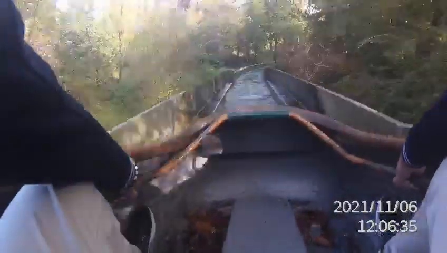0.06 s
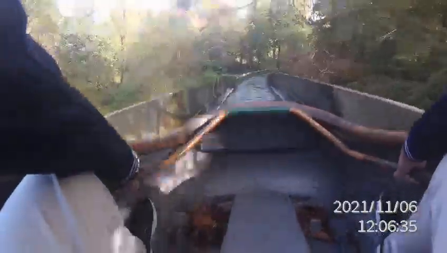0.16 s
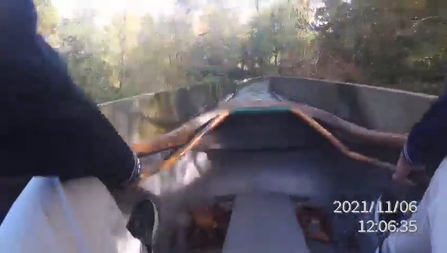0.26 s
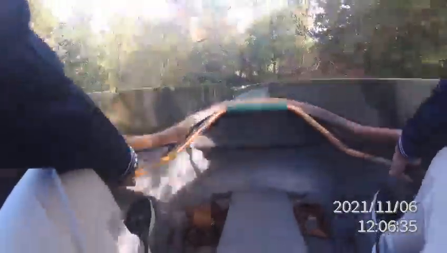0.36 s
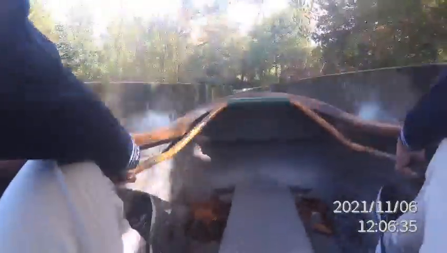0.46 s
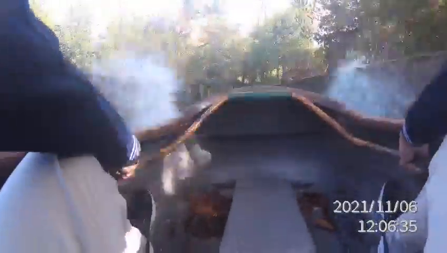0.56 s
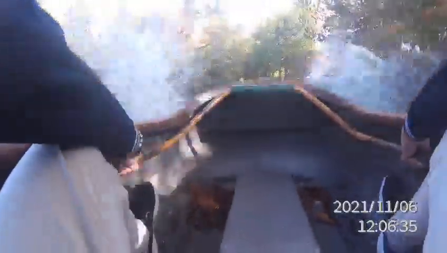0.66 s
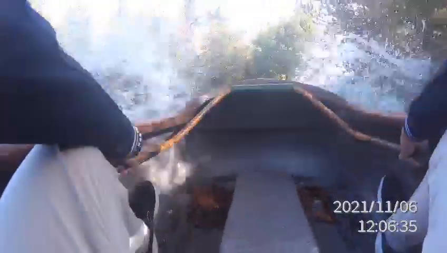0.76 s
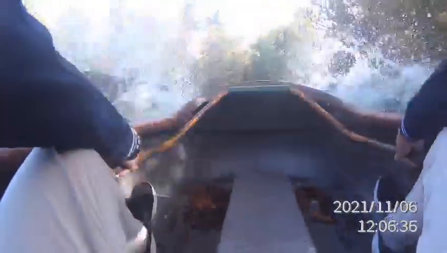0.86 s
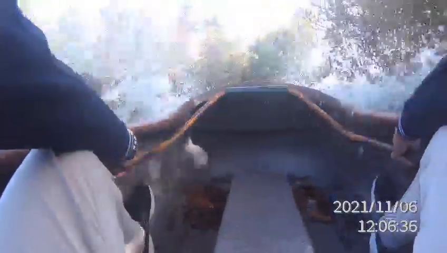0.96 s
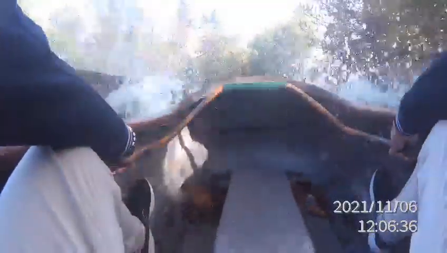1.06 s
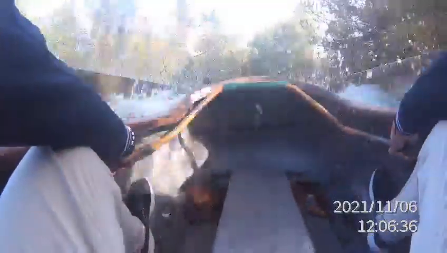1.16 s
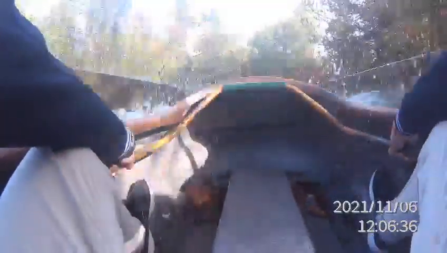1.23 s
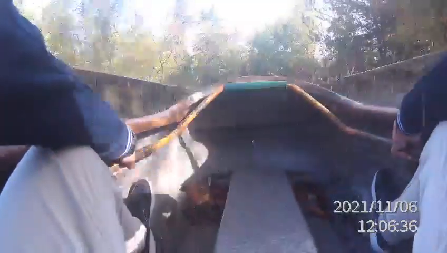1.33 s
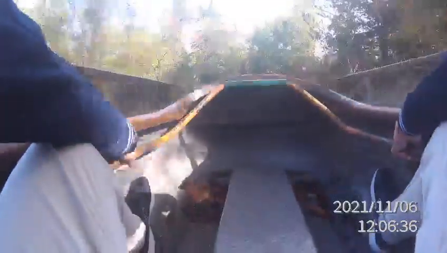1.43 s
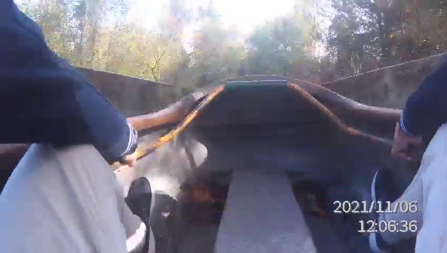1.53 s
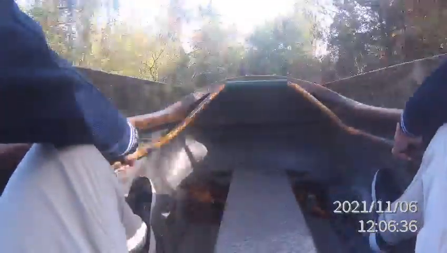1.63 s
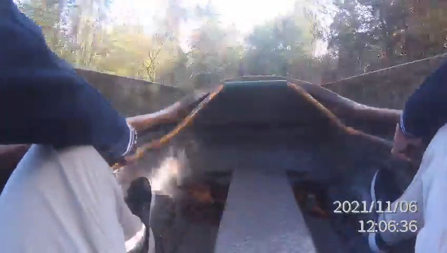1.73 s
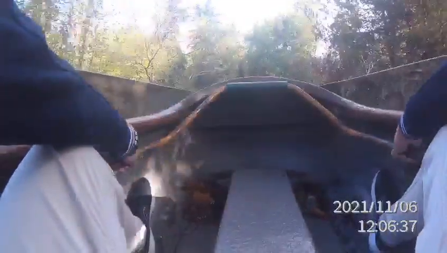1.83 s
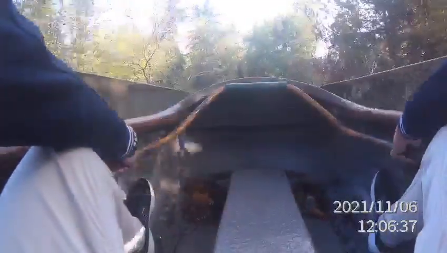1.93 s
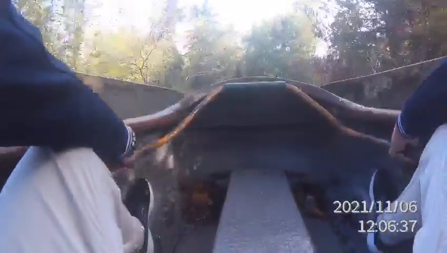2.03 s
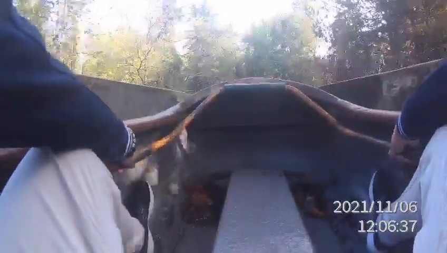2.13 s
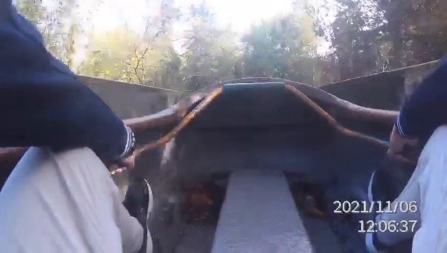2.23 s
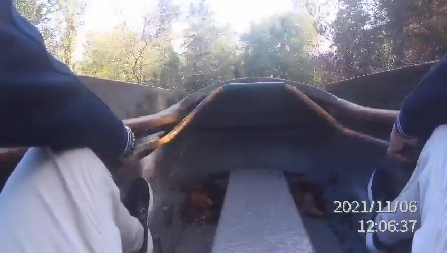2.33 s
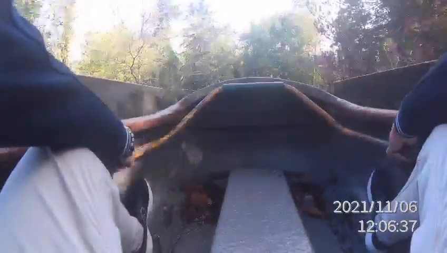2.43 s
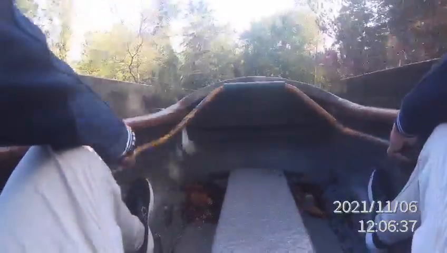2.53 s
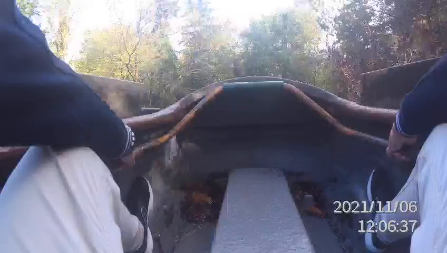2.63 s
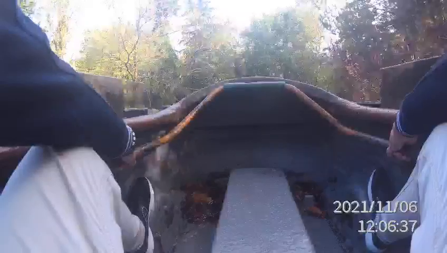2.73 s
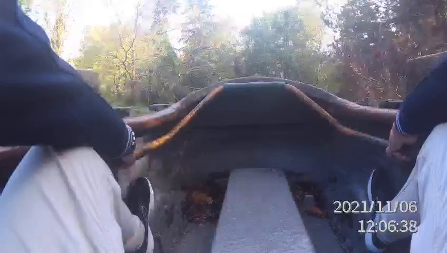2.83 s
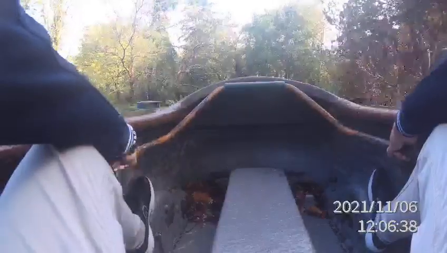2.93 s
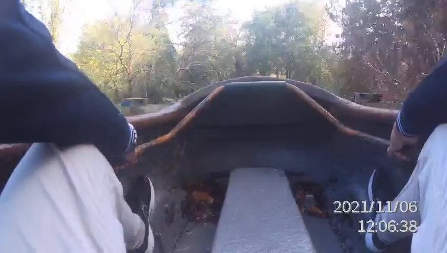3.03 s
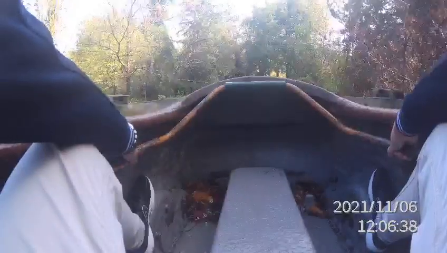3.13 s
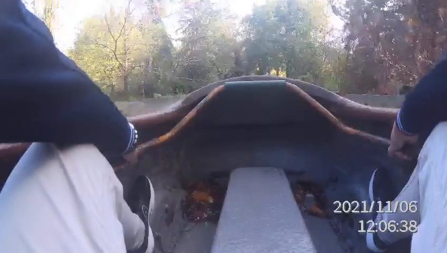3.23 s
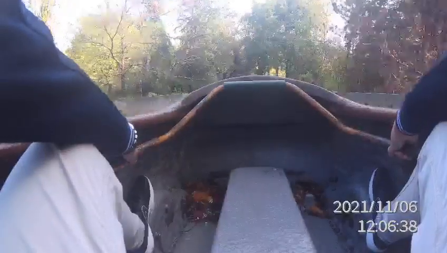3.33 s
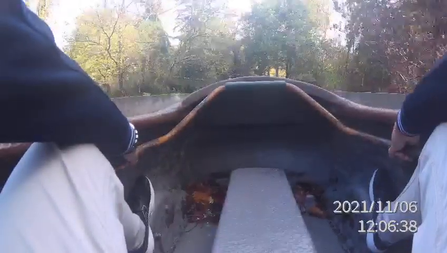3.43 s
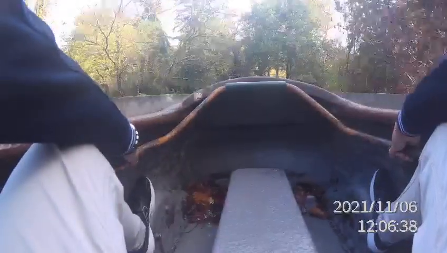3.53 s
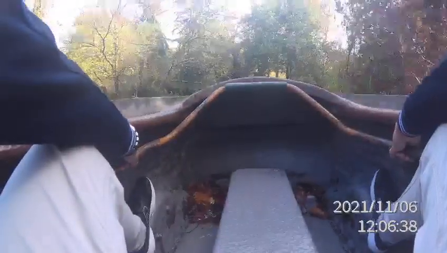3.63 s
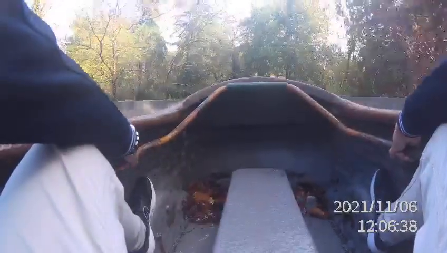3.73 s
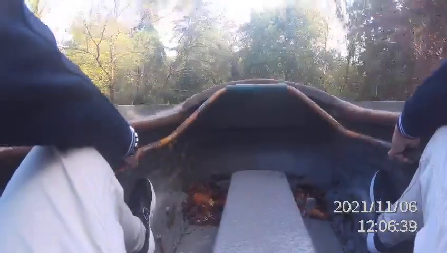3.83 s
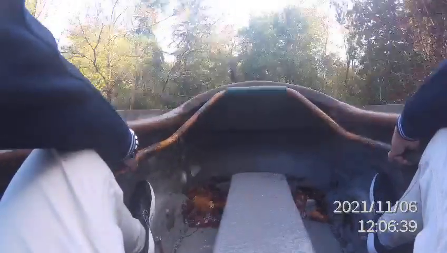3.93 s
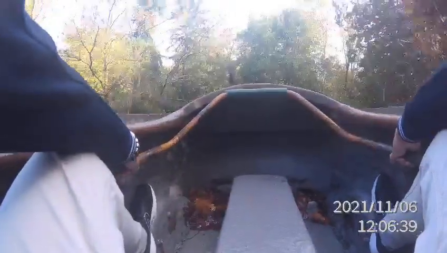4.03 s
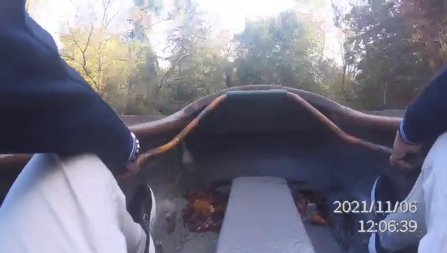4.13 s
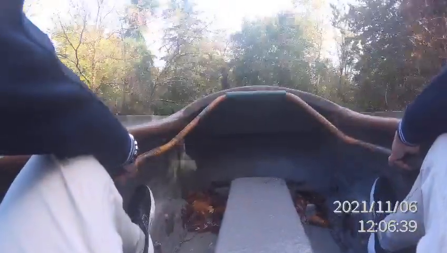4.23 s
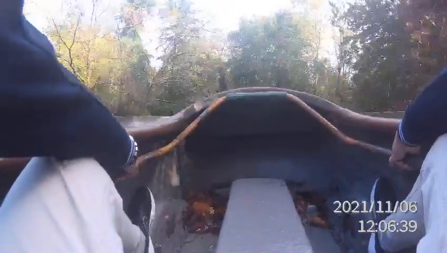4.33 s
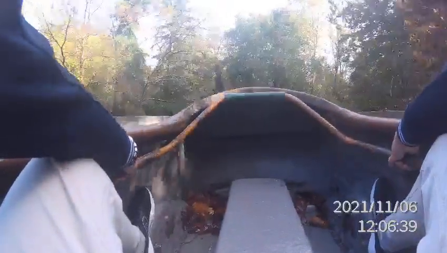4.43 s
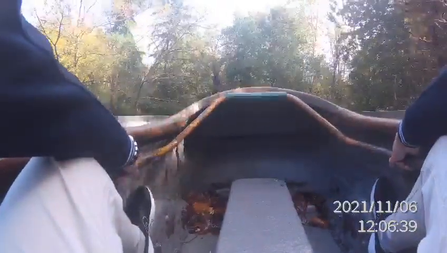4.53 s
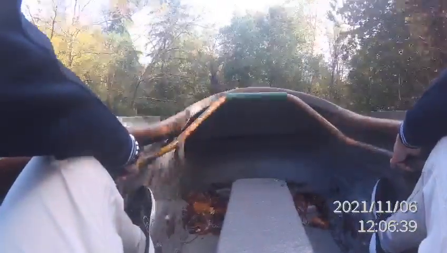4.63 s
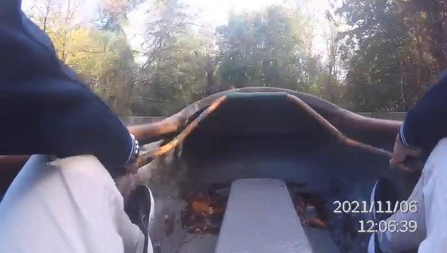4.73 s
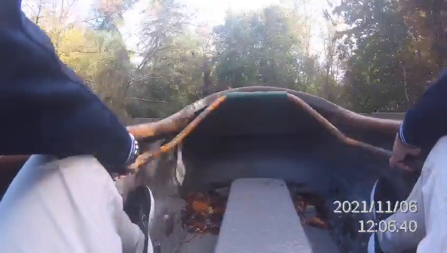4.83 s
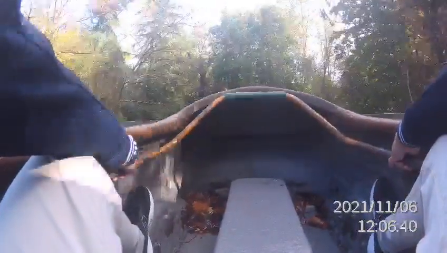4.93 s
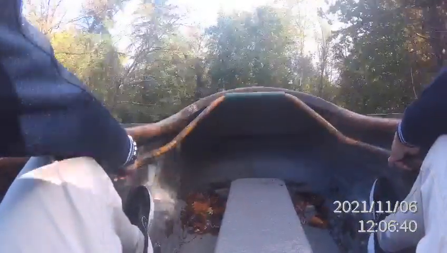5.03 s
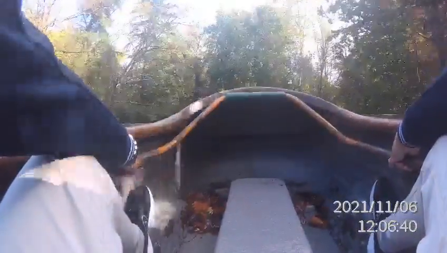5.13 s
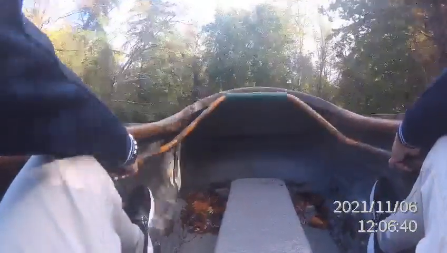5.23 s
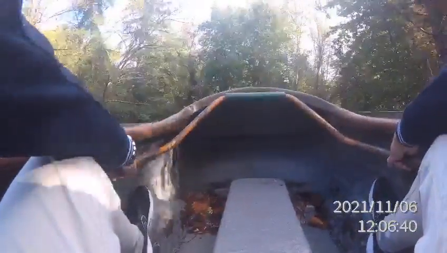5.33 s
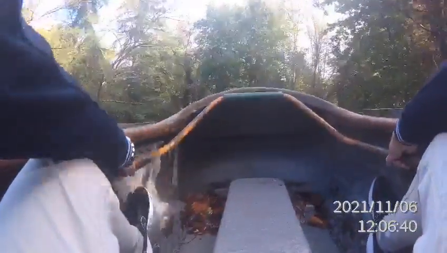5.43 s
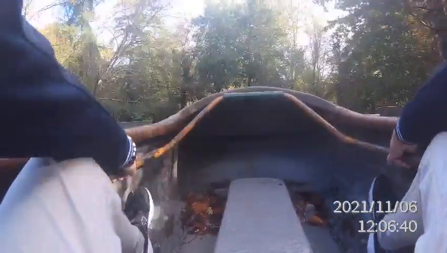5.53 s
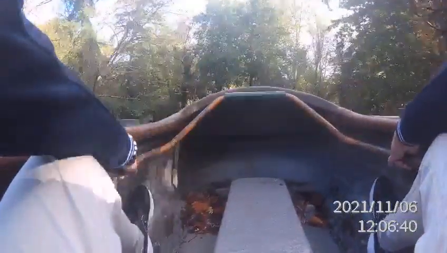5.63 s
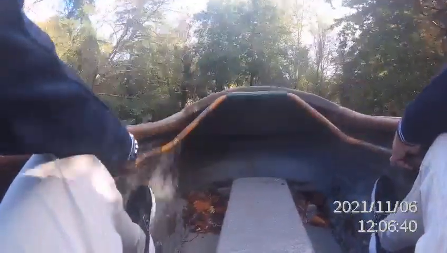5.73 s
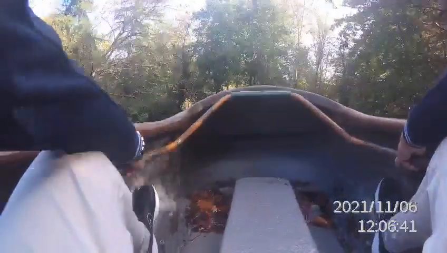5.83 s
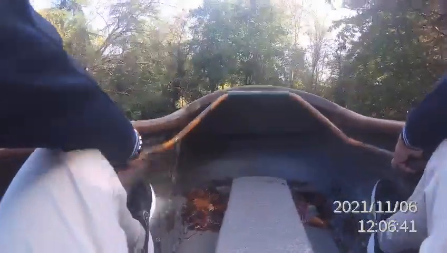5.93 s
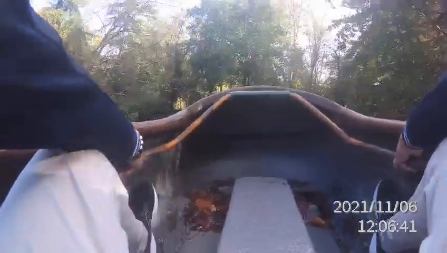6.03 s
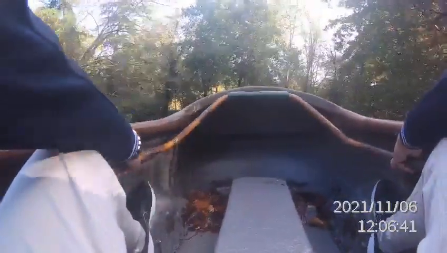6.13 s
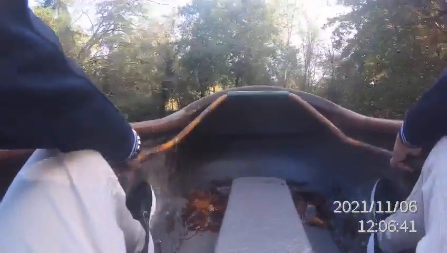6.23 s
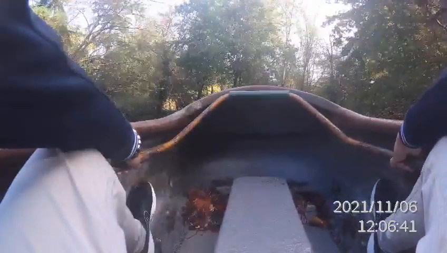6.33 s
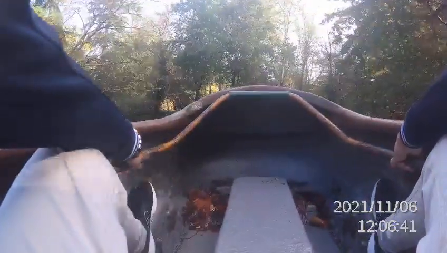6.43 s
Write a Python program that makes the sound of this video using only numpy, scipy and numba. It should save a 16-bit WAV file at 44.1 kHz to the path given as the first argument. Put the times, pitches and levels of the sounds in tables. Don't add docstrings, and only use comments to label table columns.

```python
import sys
import numpy as np
from scipy import signal
from scipy.fft import rfft, irfft
from scipy.io import wavfile
from scipy.ndimage import uniform_filter1d
from numba import njit

SR = 44100
rng = np.random.default_rng(int(sys.argv[2]) if len(sys.argv) > 2 else 0)


def level_to_linear(level):
    exponent = np.asarray(level, float) / 20
    return 10 ** exponent


def file_out(sig):
    cols = np.atleast_2d(sig).T
    lim = np.clip(cols, -1, 1)
    pcm = np.round(lim * 32767).astype(np.int16)
    wavfile.write(sys.argv[1], SR, pcm)


N = 285327
MS = np.arange(0, N / SR + .002, .001)

# time in seconds, hum pitch in Hz, level in dB.
CHUTE_ROLL = [(0.0, 89.8, -44), (.04, 91, -42), (.075, 95.4, -55), (.1, 97.4, -49), (.165, 102.1, -41),
              (.2, 108, -47), (.235, 113, -38), (0.262, 114, -36), (0.288, 119.6, -67), (0.306, 125.5, -38),
              (0.342, 125, -63), (0.372, 118, -44), (0.39, 120, -45), (0.55, 119.5, -47)]
# time in seconds, hum pitch in Hz.
UNDERWATER_ROLL = [(0.4, 92.9), (0.68, 82), (1.17, 81.8), (1.55, 73), (2.04, 57.4), (2.25, 53.6), (3.3, 50)]
# start in seconds, length in seconds, level in dB.
RAIL_TOUCHES = [
    (0.36, 0.535, -51),
    (0.92, 0.31, -58),
    (1.2, 0.41, -61),
    (1.6, .55, -69),
    (2.15, 0.41, -63),
    (2.7, 0.45, -66.5),
    (3.3, .5, -72),
]
# time in seconds, boom level in dB.
BOOM = [(0.0, -51.5), (0.28, -59), (0.7, -50), (1.2, -73), (2.1, -71.5), (3.3, -68), (4.4, -76.5),
        (6.47, -84)]
# crest in seconds, boom level in dB, sway against boom in dB, length in seconds.
BUMPS = [(0.293, -48, 0, 0.054), (1.3, -63, -8, .1), (1.853, -64, -16, 0.2), (2.222, -65, -13, 0.048),
         (2.46, -58, -21, .08), (3.1, -61, -22, .1), (3.573, -73, -5, 0.08), (4.05, -57.5, -20, 0.073),
         (4.717, -68, 2, 0.063), (5.455, -63, -3, 0.03), (5.833, -59.5, -10, 0.11)]

# time in seconds, wash level in dB,
# fineness in dB (fine drops against heavy drumming).
WASH = [(0.0, -49, -6), (0.17, -45, -3.5), (0.357, -44.5, -1), (0.364, -37, 0), (0.46, -38, 1.5),
        (0.53, -35, 0.5), (0.68, -39, 0.4), (0.86, -37.5, -0.5), (1.23, -40, -0.1), (1.5, -41, -0.5),
        (1.75, -44.5, -.5), (1.88, -44, -1.5), (1.97, -49.5, -0.5), (2.15, -52, -2), (2.6, -55.5, -2.2),
        (3.45, -57, -3.5), (3.9, -58.5, -2.5), (4.4, -61.5, 0), (5.2, -62.5, -2.5), (5.7, -72, -6)]
# time in seconds, level in dB.
SPRAY = [(0.0, -60.5), (0.35, -69), (0.37, -54.5), (0.54, -42.5), (0.68, -43), (1.0, -49.5), (1.27, -48),
         (1.47, -51), (1.58, -56), (1.94, -61.5), (2.7, -64.5)]
# crest in seconds, level in dB, length in seconds, fineness in dB.
LAPS = [(0.562, -34.5, 0.039, 0), (0.645, -37, 0.057, 5.5), (1.014, -51, 0.049, -8), (2.11, -50, 0.095, -1),
        (2.372, -51.5, 0.068, 2), (2.48, -50, 0.079, -1.5), (3.262, -54.5, 0.055, -4),
        (3.58, -49, .06, -1.5), (3.64, -61, 0.045, 9), (4.023, -55, 0.032, 1.5), (4.093, -57, 0.13, -8),
        (4.255, -64.5, 0.098, -12), (4.46, -57, 0.08, 1), (4.657, -54, 0.016, 5), (4.73, -53.5, 0.093, 0),
        (4.791, -53.5, 0.096, -6), (4.897, -58.5, 0.11, -6), (5.048, -55.5, 0.094, -3.5),
        (5.151, -53, 0.039, 2.5), (5.295, -52, 0.031, 1.5), (5.38, -65, .05, 9), (5.439, -51.5, 0.052, -6),
        (5.518, -51, 0.065, -3.5), (5.57, -54, 0.052, 3.5), (5.65, -59, 0.049, -3), (5.795, -61, 0.08, -10),
        (5.865, -52, 0.094, -1), (6.008, -55, .08, 0), (6.145, -53, 0.053, -0.5), (6.187, -53, 0.061, -2.5),
        (6.343, -53.5, 0.093, -1), (6.44, -51.5, 0.085, 0.5)]
# drumming, slosh and splatter levels in dB.
LAPPING_DB = (-60.5, -58, -59.5)

# frequency in Hz,
# width in Hz, left level in dB, right level in dB, polarity at the left.
HULL = [(166.7, 41, -6, -4, 1), (285, 67, 0.5, -0.5, 1), (378, 108, 3.5, 0.5, 1), (466, 91, 0, 4, 1),
        (612, 156, -2, -0.5, 1)]
CAVITY = [(825, 137, 1, 1.5, 1), (1004, 84, 4, -11, -1), (1283, 416, -15, 1, -1),
          (1311, 146, -7.5, 1.5, -1)]
CASE = [(1560, 224, -48, 6, -1), (1830, 300, -9, -15, 1), (2210, 370, -8, 1, 1), (2464, 310, -3, -7, 1),
        (3000, 320, -43, 5.5, 1), (3425, 190, -7, -1.5, 1), (3704, 190, -12, -5, 1),
        (3960, 270, -11.5, 0, -1)]
LID = [(4550, 910, -2, -2, 1), (5150, 430, -12.5, 1.5, -1), (5840, 900, -12.5, -15, 1)]
PORT = [(6400, 1600, -3, 6.5, -1), (7250, 3800, -1.5, -6, 1), (9250, 1900, -10, -25, 1),
        (11200, 6600, -10, -4, -1), (15900, 6300, -19, 10.5, 1)]
MOUNT = [(1540, 202, -20, 2, 1), (1830, 256, -8.5, 5, 1), (2200, 97, -15.5, -1.5, 1),
         (2500, 160, -3, -1.5, 1)]
CLAMP = [(2990, 360, -8, -1.5, 1), (3263, 220, -25, 1, 1), (3853, 163, -15.5, -0.5, -1)]
THUMP = [(300, 220, 4, -5, 1), (494, 190, 3, 1.5, 1), (670, 170, -5, 5, 1), (870, 183, -4.5, 5.5, 1),
         (977, 230, -4, -5, 1), (1346, 250, -13, 4, -1)]

# start in seconds,
# peak in dB, thump and ring against the peak in dB, pitch of the struck spot in Hz.
HINGE_KNOCKS = [(.0034, -34, -8, 1.5, 1850), (.0437, -28, -8, -9, 1800), (.0457, -23.5, 2.5, -10, 1760),
                (.0735, -23.5, -5, -1.5, 1760), (.0815, -37, -1, -14, 1800), (.1045, -34, -13, 4, 1800),
                (.1115, -48, -4, 4, 1850), (.123, -16.5, -7, -6.5, 2000), (.162, -27.5, -6, -9, 1950),
                (.45, -14.5, -3, -3.5, 1930), (.833, -13, -6.5, -2, 1950)]
BASE_KNOCKS = [
    (.2385, -17, 5.5, -24, 1540),
    (.2687, -32, 2, -15, 1600),
    (.3105, -32, -22, 0, 2300),
    (.334, -51, -17, -15, 2200),
    (.387, -21, 0, -1, 1790),
    (.4749, -10.5, -3.5, -1, 1730),
    (.4805, -23, -10, -3, 1800),
    (.497, -32, -1, -7, 1910),
]
CLIP_KNOCKS = [
    (.207, -29, -9, -2.5, 1600),
    (.445, -23, -18, 10.5, 1900),
    (.8405, -29, -6, -1, 1900),
    (.849, -26, -8, -1, 2200),
]
SLAM_KNOCKS = [
    (0.3043, .5, -7, -3.1, 2090),
]
# start in seconds, peak in dB, ring and crack against the peak in dB,
# pitch of the struck spot in Hz.
DROP_HITS = [(1.2525, -30.5, -4, -10, 1450), (0.952, -29, 7.5, -12, 2500), (.958, -29.5, 8, -12, 2500),
             (1.2307, -34, -10, -16, 1900), (1.287, -32.5, 5, 16, 2500), (1.3563, -36, -6, 11, 1900),
             (1.362, -19, 7, 2.5, 1530), (4.0075, -43, 3, -10, 1560), (4.9305, -47, -3, -10, 1550),
             (5.432, -44, -2, -10, 1600), (0.373, -28, -6, -14, 1550), (4.7, -43, 6, 10, 1800),
             (4.745, -50, 0, 7, 2500), (4.719, -47, 3, 7, 2500), (4.7625, -43, 2, 8, 2400),
             (4.915, -47, 4, 4, 2500), (5.387, -48, 2, 7, 1500), (5.8485, -42, 0, -10, 2200),
             (5.862, -43, 0, -10, 1900), (5.896, -46, 1, -8, 2300), (6.143, -46, -8, -12, 1500)]
# frequency in Hz, gain in dB.
HINGE_COLOUR = [(950, -4), (1280, -9), (1850, 3.5), (2500, 1.5), (2983, 3), (3310, -5), (3960, 9),
                (5110, 7), (9000, -11)]
BASE_COLOUR = [(950, 3.5), (1280, 1), (1540, 7.5), (2200, -6), (2500, 7), (2983, -6.5), (3310, -3),
               (4600, 1), (6470, -3), (8500, -8)]
CLIP_COLOUR = [(950, 18), (1850, -6), (2500, -2), (2983, -2), (3310, 4), (3960, -3.5), (5110, 4.5)]
SLAM_COLOUR = [(680, -6), (950, -2), (1280, 0.5), (1540, 6), (1850, -1), (2200, -5.5), (2500, 4),
               (2983, -4.5), (3310, 2), (3900, 0.5), (5100, -8), (8500, -16)]

# start in seconds, peak in dB, pitch in Hz.
GULPS = [(.043, -25, 402), (0.104, -39, 432), (.122, -21.5, 466), (.268, -28.5, 266), (.38, -19, 725),
         (.405, -21, 290), (.751, -25, 377), (1.4, -25, 791), (1.455, -26, 367), (1.496, -29, 310),
         (2.185, -38, 466), (2.443, -35.5, 303.5), (2.586, -40, 436), (2.628, -38, 385), (2.664, -46, 314),
         (2.85, -42, 400), (3.302, -47, 383), (3.435, -42, 800), (3.755, -44, 825), (4.441, -41, 860),
         (4.611, -43, 400), (5.083, -38, 816), (5.484, -35.5, 934), (6.05, -45, 900), (0.371, -33, 316),
         (0.429, -19, 282), (2.389, -36, 765), (2.875, -34.5, 367), (3.269, -43, 870), (3.571, -32.5, 430),
         (4.007, -37, 860), (4.034, -32.5, 904), (4.074, -33.5, 455), (4.229, -38.5, 386),
         (4.659, -36.5, 810), (4.697, -44, 442), (4.776, -31, 600), (4.792, -28, 805), (4.878, -41, 330),
         (4.93, -30.5, 790), (4.949, -33.5, 478), (5.29, -41, 640), (5.431, -33, 820), (5.46, -47, 300),
         (5.515, -29.5, 342), (5.54, -36, 380), (5.659, -37, 930), (5.846, -36.5, 398), (5.999, -39, 940),
         (6.147, -29, 830), (6.156, -36, 630), (6.168, -40, 810), (6.2, -40, 806), (6.309, -32.5, 432),
         (6.401, -35, 318)]
# centre in seconds, peak in dB, pitch in Hz, length in ms.
THUDS = [
    (.075, -26, 215, 2.8),
    (.272, -35, 219, 6),
    (.372, -30.5, 324, 5.6),
    (4.781, -39, 380, 3.3),
    (4.81, -45, 260, 9),
    (5.46, -43.5, 140, 4),
    (5.52, -41, 340, 6.5),
    (5.8775, -46, 150, 4),
    (6.178, -44, 333, 2.6),
]
# start in seconds, peak in dB, pitch in Hz.
DRIPS = [(2.378, -39, 2260), (3.195, -45, 1330), (3.3566, -50, 1620), (3.428, -44, 1540),
         (3.561, -47, 1340), (3.606, -52, 1470), (4.1194, -47, 1470), (4.2685, -45, 3440),
         (4.514, -45, 1320), (4.6157, -46, 2410), (4.8792, -50.5, 1540), (5.0188, -47, 1540),
         (5.1131, -49, 1310), (5.5232, -52, 1490), (5.8599, -39, 2220), (5.9, -42, 3400),
         (6.2934, -48, 3000), (1.5266, -42, 3040), (1.871, -30.5, 2040), (2.137, -41, 1560),
         (2.2811, -44, 1580), (2.3608, -36, 1380), (2.4604, -32.5, 3000), (2.52, -39, 3000),
         (2.71, -49, 1390), (3.151, -39.5, 1540), (3.279, -34.5, 2960), (3.638, -47, 1400),
         (3.742, -43, 1510), (3.8795, -42, 1540), (4.009, -36, 3350), (4.189, -36.5, 2860),
         (4.4521, -39, 1420), (4.7, -42, 1570), (4.762, -37, 1460), (5.1396, -44, 3500),
         (5.2099, -41.5, 2220), (5.294, -38, 2900), (5.3331, -45, 2020), (5.358, -39, 1830),
         (5.4326, -44, 1640), (5.5616, -36, 3570), (5.582, -37, 2130), (5.8325, -45, 1570),
         (5.8494, -42, 2280), (6.306, -37, 1600), (6.3417, -44.5, 1560)]
# frequency in Hz, density in dB per Hz.
HISS_COLOUR = [(1760, -23), (3000, -21), (5860, -14), (9690, -11.5), (10700, -13), (14600, -9),
               (15600, -11.5)]
# frequency in Hz, width in Hz, level in dB.
WHINE = [(9470, 180, -72.5), (14100, 260, -84)]


def curve(rows):
    s, *columns = np.transpose(rows)
    return [np.interp(np.arange(N) / SR, s, c) for c in columns]


def fine(x):
    return np.interp(np.arange(N) / SR, MS, x)


def unit(x):
    return x / np.sqrt(np.mean(x ** 2))


def peak(x):
    return x / np.abs(x.mean(axis=0)).max()


def add(out, s, x):
    i = int(s * SR)
    out[:, i:i + x.shape[1]] += x[:, :N - i]


@njit
def moving_ring(x, hz, width):
    y, band, low = np.empty(len(x)), 0., 0.
    for i in range(len(x)):
        g, k = np.tan(np.pi * hz[i] / SR), width / hz[i]
        v = (band + g * (x[i] - low)) / (1 + g * (g + k))
        band, low, y[i] = 2 * v - band, low + 2 * g * v, k * v
    return y


def ring(x, hz, width):
    return signal.lfilter(*signal.iirpeak(min(hz, SR / 2.2), hz / width, SR), x)


def through(modes, drive):
    left_lag = 8
    out = 0
    for hz, width, left_db, right_db, polarity in modes:
        body = ring(ring(drive(hz), hz, width), hz, 3.25 * width) / np.sqrt(width)
        late = np.r_[np.zeros(left_lag * (hz < 700)), body][:len(body)]
        out = out + np.array([polarity * level_to_linear(left_db) * late, level_to_linear(right_db) * body])
    return out


def walk(rate):
    k = int(1000 / rate)
    levels = np.repeat(rng.standard_normal(len(MS) // k + 1), k)
    return unit(uniform_filter1d(uniform_filter1d(levels, k), k)[:len(MS)])


def swell(s, length_s):
    since = (MS - s) / length_s
    return np.exp(-3.2 * np.where(since < 0, since / 0.58, since) ** 2)


def wheel_hum():
    t = np.arange(N) / SR
    end_s, end_hz, _ = CHUTE_ROLL[-1]
    roll_hz, roll_db = curve(CHUTE_ROLL + [(end_s + .1, end_hz, -90)])
    touch = 0
    for s, length_s, db in RAIL_TOUCHES:
        touch = touch + level_to_linear(db) * np.clip(np.minimum(t - s, s + length_s - t) / 0.039, 0, 1)
    out = 0
    for hz, gain, width in ((roll_hz, level_to_linear(roll_db), 14.), (curve(UNDERWATER_ROLL)[0], touch, 15.)):
        phase = 2 * np.pi * np.cumsum(hz * (1 + .03 * fine(walk(25)))) / SR
        steady = np.sqrt(2) * np.sin(phase)
        rough = moving_ring(moving_ring(rng.standard_normal(N), hz, width), hz, width)
        out = out + gain * (.6 * steady + 0.78 * unit(rough))
    return out


def hull_boom():
    boom_db = curve(BOOM)[0]
    sway_bumps = sum(level_to_linear(db + sway_db) ** 2 * swell(s, d) for s, db, sway_db, d in BUMPS)
    boom_bumps = sum(level_to_linear(db) ** 2 * swell(s, d) for s, db, _, d in BUMPS)
    sway = np.hypot(level_to_linear(-73.5 + 0.44 * (boom_db + 59.5)), fine(sway_bumps ** .5))
    boom = np.hypot(level_to_linear(boom_db), fine(boom_bumps ** .5))
    out = 0
    for gain, hz, width, apart, lean_db in ((sway, 48, 30, .5, 1.8), (boom, 120, 70, .3, .2)):
        mid, side = (unit(ring(ring(rng.standard_normal(N), hz, width), hz, width)) for _ in range(2))
        both = mid + apart * side * np.array([[1], [-1]])
        out = out + gain * both * level_to_linear(np.array([[-lean_db], [lean_db]]))
    return out


def wetting():
    lap_gain_db = -2
    db, fine_db = curve(WASH)
    gains = []
    for lean, extra_db, least_db in zip((-1, 0, 1), (0, 0.5, 0), LAPPING_DB):
        laps = sum(level_to_linear(d + lean * f + lap_gain_db) ** 2 * swell(s, length_s) for s, d, length_s, f in LAPS)
        power = level_to_linear(db + lean * fine_db) ** 2 + fine(laps)
        gains.append(np.sqrt(level_to_linear(extra_db) ** 2 * power + level_to_linear(least_db) ** 2))
    return gains


def drops(per_s, spread_db, tail_s):
    lands, luck = rng.random((N, 2)).T
    size = (lands < per_s / SR) * level_to_linear(np.minimum(-spread_db * np.log(1 - luck), 4 * spread_db))
    return signal.lfilter([1], [1, -np.exp(-1 / (tail_s * SR))], size)


def water(drum, slosh, splatter):
    patter = drops(per_s=110, spread_db=0.5, tail_s=0.0016)
    surge = walk(20)
    spray = level_to_linear(curve(SPRAY)[0])
    lid = level_to_linear(-0.5) * splatter ** 0.66 * spray ** 0.43
    bright = np.hypot(level_to_linear(-8.0) * splatter, level_to_linear(5.5) * spray)
    gusts = spray * level_to_linear(1.1 * fine(walk(9)))
    # modes, gain, share of drops in the turbulence, flicker in dB
    layers = ((HULL, drum, .25, 1.6), (CAVITY, slosh, .45, 1.5), (CASE[:4], level_to_linear(-2.5) * splatter, .6, 1.5),
              (CASE[4:], bright, .6, 1.5), (LID, lid, .55, 1.5), (PORT, gusts, .5, 1.2))
    out = 0
    for modes, gain, grain, flicker_db in layers:
        def turbulence(hz):
            flow = rng.standard_normal(N) * (1 + grain * patter)
            return flow * fine(level_to_linear(flicker_db * (0.26 * surge + walk(18))))
        band = through(modes, turbulence)
        out = out + band / np.std(band.mean(axis=0)) * gain
    return out


def hiss():
    hz = np.fft.rfftfreq(N, 1 / SR)
    at, db = np.transpose(HISS_COLOUR)
    colour = level_to_linear(np.interp(np.log(hz + 1), np.log(at), db))
    out = level_to_linear(-61 + 4.0) * unit(irfft(rfft(rng.standard_normal((2, N))) * colour, N))
    frame_hz = 29.97
    pulse = (np.arange(N) * frame_hz / SR + .1) % 1 < .45
    return out + sum(level_to_linear(db) * unit(ring(rng.standard_normal(N) * pulse, f, w)) for f, w, db in WHINE)


def impact(thump_db, ring_db, crack_db, spot_hz, ms, colour):
    t = np.arange(1500) / SR
    strike = 6 * np.exp(-((t - .00015) / .00007) ** 2)
    build = -np.expm1(-1000 * t / 0.09)
    fade = np.exp(-(t / (0.00067 * ms)) ** 2)
    at, favour_db = np.transpose(colour)

    def blow(hz):
        favour = level_to_linear(np.interp(np.log(hz), np.log(at), favour_db))
        return (rng.standard_normal(len(t)) * build + strike) * fade * favour

    mix = peak(through(MOUNT, lambda hz: blow(hz) * level_to_linear(-16.5 * abs(np.log2(hz / spot_hz)))))
    mix += level_to_linear(thump_db) * peak(through(THUMP, lambda hz: blow(hz) * min(hz / 950, 1.) ** 1.23))
    mix += level_to_linear(ring_db) * peak(through(CLAMP + LID[1:2], lambda hz: blow(hz) * level_to_linear(-6.5 * (hz > 4200))))
    mix += level_to_linear(crack_db) * peak(through(LID + PORT, lambda hz: blow(hz) * fade * hz / 8000))
    return mix


def rattle():
    out = np.zeros((2, N))
    for knocks, colour, ms in ((HINGE_KNOCKS, HINGE_COLOUR, 4.6), (BASE_KNOCKS, BASE_COLOUR, 4.6),
                               (CLIP_KNOCKS, CLIP_COLOUR, 4.6), (SLAM_KNOCKS, SLAM_COLOUR, 2.3)):
        for s, db, thump_db, ring_db, spot_hz in knocks:
            crack_db = -11 + 0.19 * ring_db
            add(out, s, level_to_linear(db) * impact(thump_db, ring_db, crack_db, spot_hz, ms, colour))
    for s, db, ring_db, crack_db, spot_hz in DROP_HITS:
        add(out, s, level_to_linear(db) * impact(-7, ring_db, crack_db, spot_hz, 2.7, CLIP_COLOUR))
    return out


def gulps():
    out, t = np.zeros((2, N)), np.arange(4500) / SR
    for s, db, pitch_hz in GULPS:
        t60 = 0.076 * (500 / pitch_hz) ** .55
        fade = np.exp(-np.log(1000) * t / t60) * (1 - np.exp(-t / 0.00045))
        bubble = np.sin(2 * np.pi * pitch_hz * t * (1 + 1.0 * t)) * fade

        def shake(hz):
            return rng.standard_normal(len(t)) * fade * level_to_linear(-9 * abs(np.log2(hz / pitch_hz)))
        slap = through(HULL[1:] + CAVITY, shake)
        patter = through(CASE, lambda hz: rng.standard_normal(len(t)) * fade)
        mix = 0.5 * bubble + 0.42 * slap / np.abs(slap).max()
        mix += 0.73 * level_to_linear(-23) * patter / np.abs(patter).max()
        add(out, s, level_to_linear(db) * mix)
    return out


def thuds():
    t = np.arange(N) / SR
    blow = 0
    for s, db, hz, ms in THUDS:
        blow = blow + level_to_linear(db) * np.cos(2 * np.pi * hz * (t - s)) * np.exp(-(1000 * (t - s) / ms) ** 2)
    return np.array([blow, blow])


def drips(splatter):
    out, t = np.zeros((2, N)), np.arange(1200) / SR
    splatter_db = 20 * np.log10(splatter)
    plinks = [(*row, -21) for row in DRIPS]
    for where, size, pitch in rng.random((400, 3)):
        db = splatter_db[int(where * N)] - 0.5 + 9 * size
        plinks.append((where * N / SR, db, 1300 * 3.17 ** pitch, -25))
    for s, db, pitch_hz, tick_db in plinks:
        fade = np.exp(-t * pitch_hz / 5.5) * (1 - np.exp(-t / 0.00037))
        bubble = np.sin(2 * np.pi * pitch_hz * t * (1 + 5 * t)) * fade
        tick = np.diff(rng.standard_normal(len(t) + 1)) * np.exp(-t / 0.0011)
        add(out, s, level_to_linear(db - 1.5) * (bubble + level_to_linear(tick_db) * tick) * np.array([[.45], [1.5]]))
    return out


def scene():
    drum, slosh, splatter = wetting()
    out = water(drum, slosh, splatter) + hull_boom() + wheel_hum()
    return out + thuds() + rattle() + gulps() + drips(splatter) + hiss()


def band_limit(x):
    return signal.sosfilt(signal.butter(12, 16110, fs=SR, output="sos"), x)


def record(dry):
    top = signal.ellip(8, .2, 36, 15250, fs=SR, output="sos")
    mix = np.clip(signal.sosfilt(top, np.clip(dry, -1, 1)), -1, 1)
    return band_limit(mix)


dry = scene()
out = record(dry)
file_out(out)
```